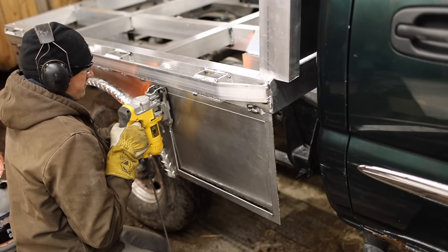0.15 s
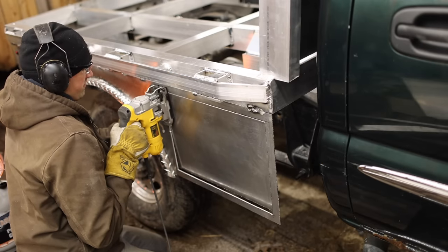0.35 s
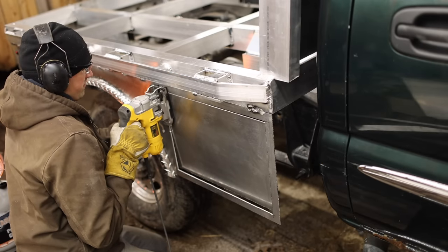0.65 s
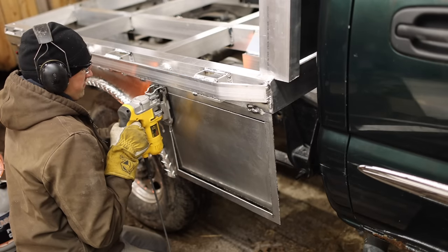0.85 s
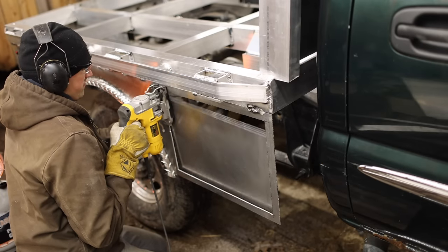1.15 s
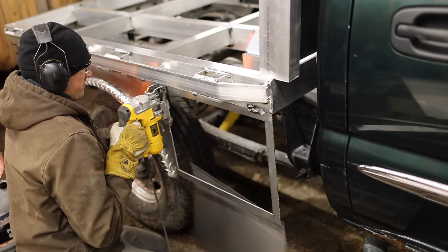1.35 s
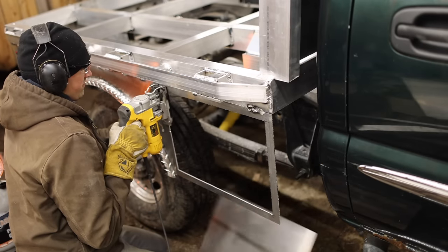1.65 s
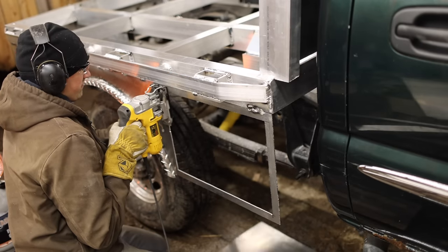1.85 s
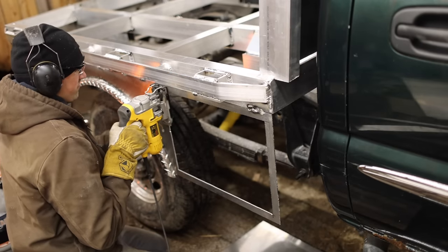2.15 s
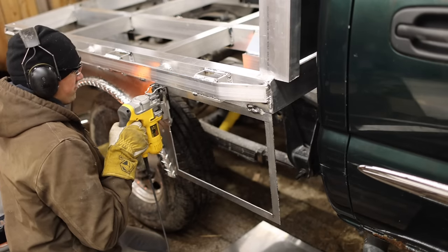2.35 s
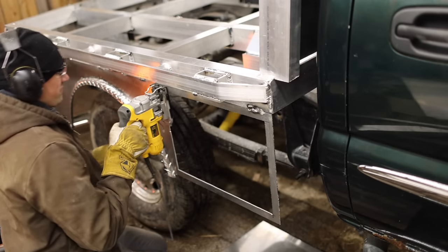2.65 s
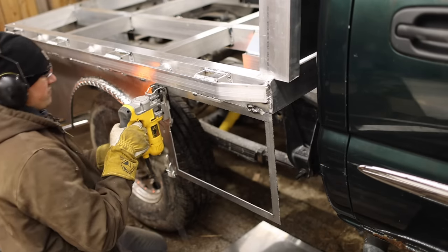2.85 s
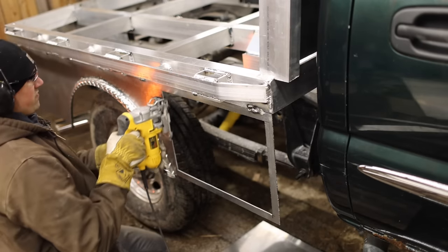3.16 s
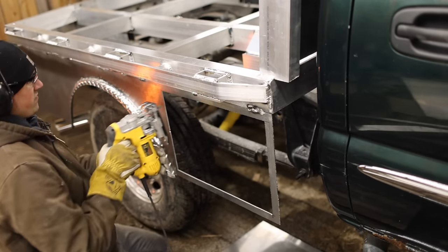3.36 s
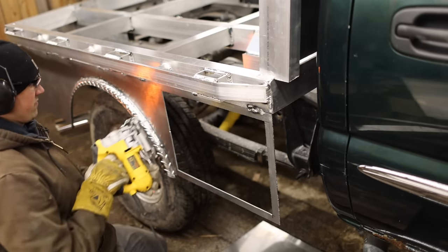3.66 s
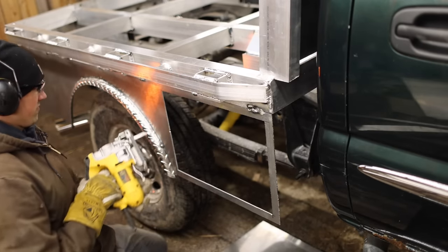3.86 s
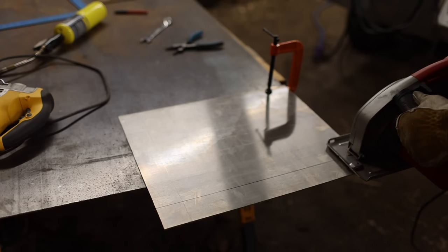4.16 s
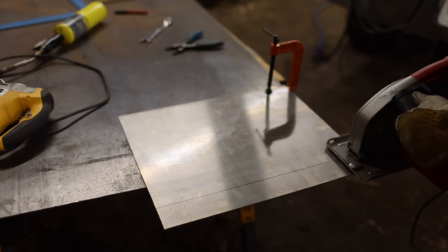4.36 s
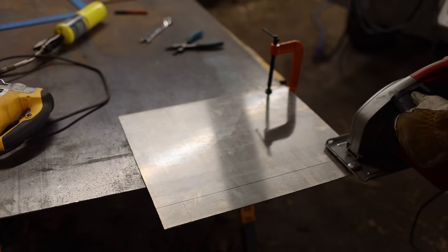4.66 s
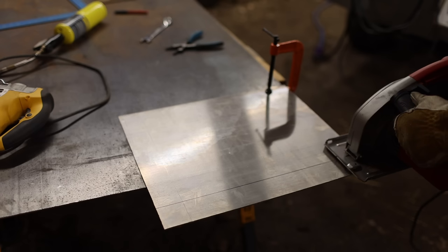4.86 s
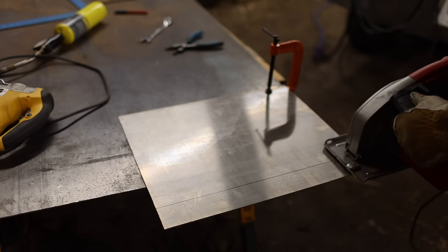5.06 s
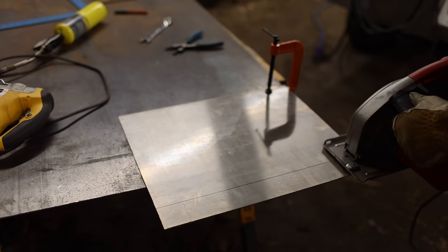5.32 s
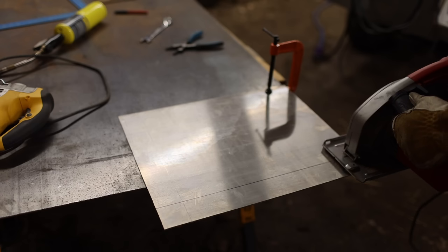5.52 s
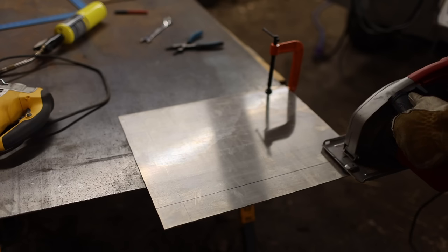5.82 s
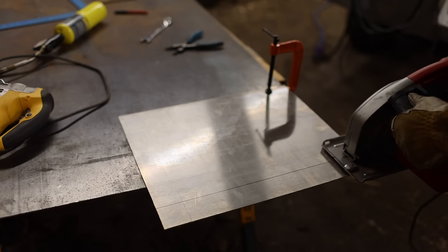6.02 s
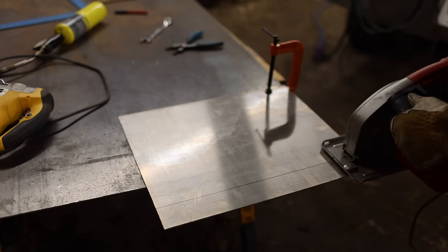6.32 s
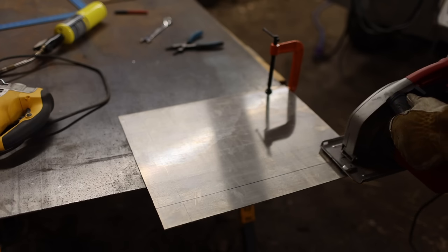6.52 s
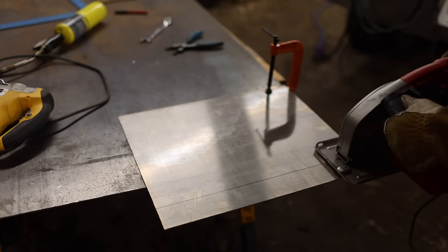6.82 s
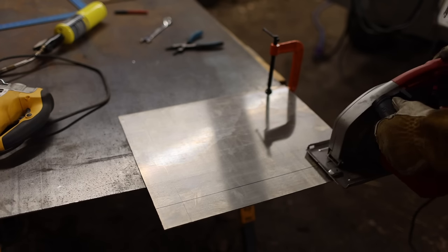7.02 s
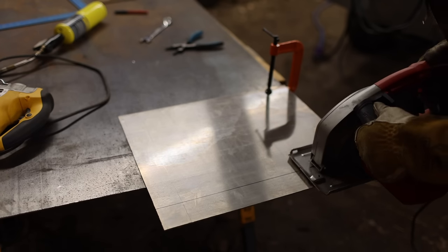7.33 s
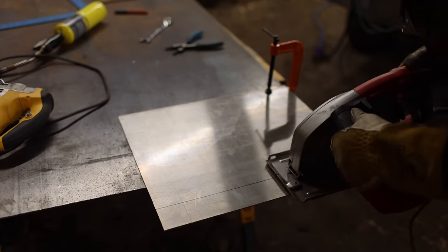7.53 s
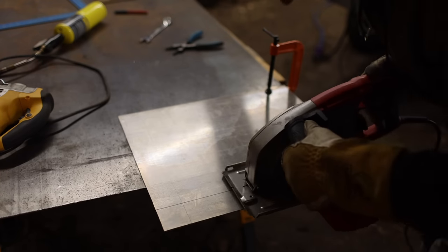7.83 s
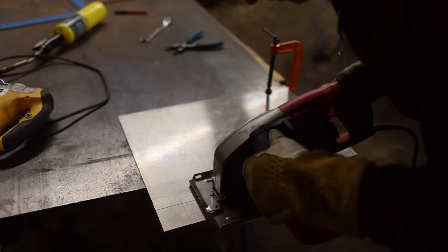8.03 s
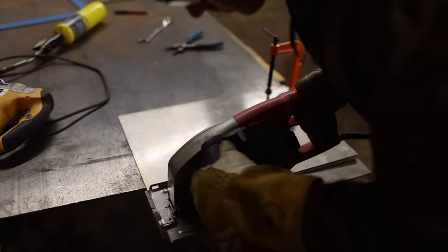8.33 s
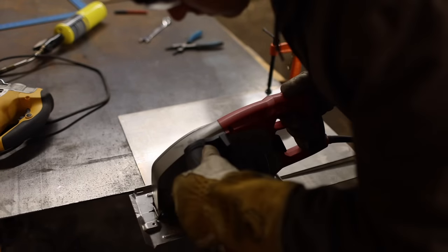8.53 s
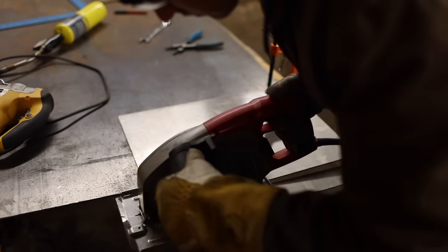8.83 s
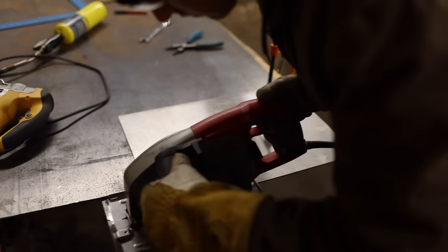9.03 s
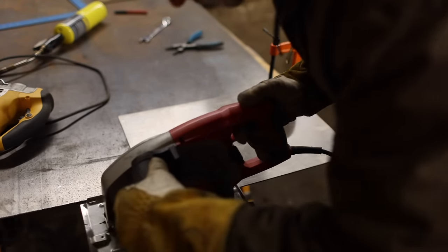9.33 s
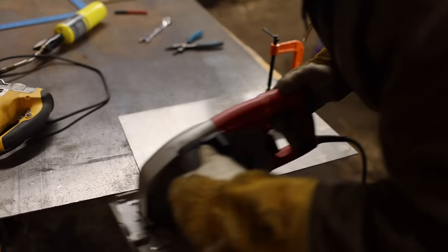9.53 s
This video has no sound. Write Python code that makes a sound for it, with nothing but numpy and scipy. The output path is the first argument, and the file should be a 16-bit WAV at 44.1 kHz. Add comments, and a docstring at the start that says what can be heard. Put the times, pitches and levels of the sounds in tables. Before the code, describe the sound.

Close, dry, centred sound in a garage. From 0 s a jigsaw rasps steadily at about fifty strokes a second, a harsh noisy buzz with shifting metallic drones and a very thin high whine. Near 1.6 s the cut panel comes free and the ringing thins, without a marked crash. At 1.85 s the tool is switched off and coasts: rasp fades, tones and gear whistle slide down, rattling grows, and from 3.4 s separate clacks tick about thirty times a second, slowing until 4 s over faint hum. A tenth of a second of faint hiss follows. At 4.13 s a circular saw buzzes low, then whirs up to a singing whine. From 5.5 s it cuts sheet in uneven, hissing, whistling pushes; from 7.4 s the cut deepens, louder and shriller, its pitch sagging. At 9.1 s cutting stops and the motor whine falls, still running at 9.7 s.

```python
"""A jigsaw in a garage finishes a cut in an aluminium panel, is switched off and coasts down clacking; silence follows.
A circular saw then buzzes, spins up, cuts a clamped sheet in uneven pushes and runs down, all at one microphone.
Each tool is banded noise for its rasp, with sines on multiples of its rotation and noise-driven resonances
for its whines, whistles and ringing parts. Only the faint hiss of the microphone fills the gap."""
import sys
import numpy as np
from scipy import signal
from scipy.fft import rfft, irfft, next_fast_len
from scipy.io import wavfile
from scipy.ndimage import uniform_filter1d, map_coordinates

SR = 44100
rng = np.random.default_rng(int(sys.argv[2]) if len(sys.argv) > 2 else 0)


def waveform_to_disk(signal):
    """Save audio, clipped to [-1, 1], as 16-bit WAV at the path in sys.argv[1]."""
    frames = np.transpose(np.atleast_2d(signal))
    scaled = np.clip(frames, -1, 1) * 32767
    samples = np.round(scaled).astype(np.int16)
    wavfile.write(sys.argv[1], SR, samples)


N = 426885
T = np.arange(N) / SR
JIG_END_S, SAW_START_S = 4.024, 4.128
OFF_S, PANEL_DROPS_S = 1.849, 1.6  # the jigsaw is switched off; the cut panel falls out

# The jigsaw's pace under power. Each row: time in seconds, strokes per second.
JIG_STROKES = [(0.0, 51.7), (0.7, 51.7), (0.9, 51.55), (1.2, 51.8), (1.45, 52.1), (1.64, 53.1), (1.8, 53.0),
               (1.85, 51.9)]
WHINE_PER_STROKE, JIG_WHINE_HZ = 304, 15712  # ratio while coasting; whine under power
COAST_S, COAST_POWER = 5.347, 3.012  # speed falls as (1 - time since switch-off / COAST_S) ** COAST_POWER
CRANK_LEAD = .78  # share of a half stroke past the reversal at switch-off


def jigsaw():
    """One crank drives the rasp, panel tones and clacks; switched off, it slows along a power curve."""
    t = T[T < JIG_END_S]
    on = t < OFF_S
    whine_hz = JIG_WHINE_HZ * (1 - np.clip(t - OFF_S, 0, None) / COAST_S) ** COAST_POWER
    rate = np.where(on, curves(JIG_STROKES, t)[0], whine_hz / WHINE_PER_STROKE)
    phase = turns(rate)
    reversals = (phase - phase[on.sum()]) / np.pi + CRANK_LEAD
    throb = stroke_throb(t, rate, phase, reversals)
    out = jigsaw_rasp(t, rate, throb) + panel_tones(t, rate, phase)
    out = out + jigsaw_whine(t, whine_hz) + gear_whistle(t, rate, throb) + brief(t, JIG_RINGS)
    return out + clacks(t, reversals, rise_s=.003, fall_s=.0045) + garage_hum(t)


THROB_MAX_DB, THROB_FADES_S = 3.2, 3.4  # depth limit before it wanders; the rasp softens near rest


def stroke_throb(t, rate, phase, reversals):
    """The teeth rasp twice a stroke, and slower strokes leave clearer gaps between the two rasps."""
    depth_db = np.minimum(1 + 4 * (1 - rate / rate[0]), THROB_MAX_DB)
    depth_db = depth_db - 2 * np.clip(t - THROB_FADES_S, 0, 1)
    wandering_db = depth_db * (1 + .4 * walk(20, len(t)))
    return wandering_db * np.cos(2 * np.pi * reversals - .4) + .6 * np.cos(4 * phase)


# The jigsaw's noise before a small trim. Each row: time in seconds, middle level in dB,
# then bass, panel boom and hiss in dB over the middle.
JIG_LEVELS = [(0.0, -28, -19, -5, 1.5), (0.32, -29, -19, -4, 2), (0.85, -29, -19.5, -4, 2.5),
              (1.4, -29, -17.5, -5, 2.5), (1.52, -30.5, -18, -5.5, 2.5), (2.0, -31.5, -24.5, -6.5, 2),
              (2.45, -36, -32, -7, 0), (3.0, -41, -35, -5, -1.5), (3.22, -45, -23, -4.5, 0.5),
              (3.45, -52, -17, -4, -0.5), (3.75, -55, -19, -10.5, -1), (4.02, -55.5, -19, -15, -4.5)]
# Those four regions. Each row: lowest and highest frequency in Hz.
JIG_BANDS = [(900, 3500), (40, 220), (280, 750), (4500, 14000)]
# Relative spectrum of the rasp. Each row: frequency in Hz, density in dB per Hz.
JIG_COLOUR = [(15, -62.5), (25, -30.5), (254, -16), (283, -13.5), (512, -8.5), (602, -11), (688, -13),
              (878, -11), (1060, -3.5), (1180, -8.5), (1390, -2.5), (1720, -6.5), (1970, -5), (9930, -6.5),
              (15700, -19.5)]
# Its resonances. Each row: frequency in Hz, width in Hz, boost in dB.
JIG_PEAKS = [(1930, 110, 2.5), (3310, 46, 7), (4240, 83, -0.5), (5430, 45, 5.5), (5750, 65, 6.5),
             (6120, 46, 7.5), (7230, 660, 3), (7660, 45, 4), (9600, 200, 2.5), (10360, 130, 7),
             (11400, 41, 8.5), (12800, 80, 4)]
# Extra colour of the unloaded jigsaw. Each row: frequency in Hz, width in Hz, boost in dB.
COAST_PEAKS = [(2600, 510, 2), (3930, 480, -3), (5040, 250, 2.5), (6600, 310, 4.5), (9000, 610, -1.5),
               (12800, 1500, 0)]
STROKE_REPEAT = 0.29  # share of the rasp that comes again one stroke later, while the panel is being cut


def jigsaw_rasp(t, rate, throb):
    """Teeth tear the metal as noise that throbs with the strokes and partly repeats from stroke to stroke."""
    rasp = undb(-1.0) * roar(t, JIG_COLOUR, JIG_PEAKS, regions(JIG_LEVELS, t), JIG_BANDS, throb,
                             shake_db=0.7, flicker_db=0.82, treble_throb=0.67)
    rasp = tint(rasp, COAST_PEAKS, np.interp(t, [OFF_S, OFF_S + 0.66], [0, 1]))
    return again(rasp, rate, STROKE_REPEAT * window(t, -1, PANEL_DROPS_S))


# How the panel answers the strokes at full speed. Each row: multiple of the stroke rate, level in dB.
PANEL = [(1, -22), (2, -24.5), (3, -17.5), (4, -22.5), (5, -12.5), (6, -14), (7, -9), (8, -9), (9, -8),
         (10, -3), (11, -9), (12, -13), (13, -3), (14, -9.5), (15, -17), (16, -13), (17, -21.5),
         (18, -13.5), (19, -14.5), (20, -8.5), (21, -11), (22, -15.5), (23, -20), (24, -15.5), (25, -10),
         (26, -14), (27, -10), (28, -19), (29, -19.5), (30, -9), (31, -13), (34, -20), (38, -17),
         (39, -12.5), (40, -21), (41, -21), (42, -5.5), (43, -20), (46, -25), (47, -10.5), (48, -25),
         (56, -18.5)]
# Overall level of those tones. Each row: time in seconds, dB over the middle of the noise.
STROKE_TONES = [(0, -8.5), (.3, -10.5), (.5, -8.5), (1.0, -8), (1.45, -10), (1.6, -8.5), (1.9, -11.5),
                (2.4, -12.5), (2.8, -15.5), (3.25, -13), (3.45, -27), (4.03, -40)]
# Multiples that stand out for a while. Each row: start and end in seconds, multiple, extra dB.
SINGING_MULTIPLES = [(0, .25, 9, 10), (0, .25, 13, 4.5), (0, .35, 26, 14), (0, .35, 27, 1), (0, .15, 11, 9),
                     (0.41, 1.35, 10, 6.5), (0.596, .75, 9, 7), (0.616, .88, 14, 8), (.74, .86, 8, 11),
                     (.74, .9, 27, 11.5), (.94, 1.068, 27, 14.5), (.75, .86, 30, 7), (1.15, 1.4, 30, 8),
                     (0, 1.15, 47, 4.5), (.94, 1.06, 39, 8), (0.982, 1.55, 8, 11), (1.0, 1.22, 9, 6.5),
                     (1.03, 1.18, 24, 15.5), (1.22, 1.462, 24, 20), (1.202, 1.47, 20, 10.5),
                     (1.1, 1.47, 25, 7), (1.398, 1.95, 7, 7), (1.6, 1.95, 13, 5.5), (1.92, 2.07, 11, 11.5),
                     (2.1, 2.43, 11, 11), (2.12, 2.36, 13, 10.5), (2.32, 2.43, 12, 14),
                     (1.78, 2.07, 10, 5.5), (2.1, 2.23, 7, 8.5), (2.03, 2.12, 9, 2), (2.33, 2.57, 9, 11),
                     (2.33, 2.47, 14, 7.5), (2.7, 2.8, 14, 13), (2.45, 2.75, 13, 13), (2.5, 3.6, 2, 12),
                     (2.9, 3.0, 16, 10), (3.02, 3.25, 19, 13), (3.27, 3.37, 19, 6)]
FRAME_TOP_HZ, FRAME_DAMP_DB = 650, -6  # with the panel gone, the bare frame rings less above this
FRAME_BOTTOM_HZ, FRAME_THIN_DB = 270, -8  # coasting, the bare frame hardly carries the lowest multiples


def panel_tones(t, rate, phase):
    """Strokes shake the panel on their multiples; coasting, each slides through the same resonances."""
    tones_db = curves(JIG_LEVELS, t)[0] + curves(STROKE_TONES, t)[0]
    multiples, panel_db = np.transpose(PANEL)
    panel_gone = window(t, PANEL_DROPS_S, JIG_END_S)
    coasting = window(t, OFF_S + .2, JIG_END_S)
    out = 0
    for k in range(2, 57):
        hz = k * rate
        db = np.interp(hz / rate[0], multiples, panel_db) + tones_db + 1.4 * walk(7, len(t))
        db = db + FRAME_DAMP_DB * panel_gone * np.clip(hz / FRAME_TOP_HZ * 10 - 9, 0, 1)
        db = db + FRAME_THIN_DB * coasting * np.clip(10 - hz / FRAME_BOTTOM_HZ * 10, 0, 1)
        for a, b, multiple, extra_db in SINGING_MULTIPLES:
            if k == multiple:
                db = db + extra_db * window(t, a, b)
        out = out + tone(k * phase, db)
    return out


# The jigsaw's commutator whine. Each row: time in seconds, level in dB before it wanders.
JIG_WHINE = [(0, -47), (1.1, -44), (1.25, -65.5), (1.8, -66), (1.87, -48), (2.5, -46), (3.0, -58),
             (3.2, -60), (3.3, -87)]


def jigsaw_whine(t, whine_hz):
    """The commutator whine holds its pitch under power and falls with the strokes while coasting, unsteadily."""
    return tone(turns(whine_hz) + 0.7 * walk(100, len(t)), curves(JIG_WHINE, t)[0] + 3 * walk(25, len(t)))


GEAR_TEETH = 92
# Gears whistling while the tool coasts. Each row: time in seconds, level in dB before the throb.
GEAR_WHISTLE = [(2.15, -70), (2.26, -42), (2.38, -43), (2.43, -47), (2.5, -43), (2.6, -46), (2.68, -50),
                (2.8, -47), (2.92, -56), (3.1, -80)]


def gear_whistle(t, rate, throb):
    """Meshing gears whistle as a narrow band on the tooth rate, throbbing with the strokes."""
    return ring(t, GEAR_TEETH * rate, 55, curves(GEAR_WHISTLE, t)[0] + 1.3 * throb)


# Brief rings of the jigsaw, played by brief().
# Each row: start and end in seconds, frequency in Hz, width in Hz, level in dB.
JIG_RINGS = [(2.42, 2.5, 4900, 50, -50), (2.64, 2.92, 5100, 45, -52), (2.8, 3.0, 5400, 50, -56),
             (3.13, 3.27, 5120, 160, -49), (3.13, 3.27, 5450, 200, -55), (3.13, 3.27, 5780, 160, -53),
             (3.3, 3.6, 4950, 80, -63), (3.04, 3.14, 450, 25, -50), (3.24, 3.3, 370, 25, -52),
             (3.36, 3.43, 570, 25, -55)]

# Modes of the rattling housing. Each row: frequency in Hz, width in Hz, relative level in dB.
HOUSING = [(1346, 350, -4), (1987, 380, -0.5), (2420, 360, -4.5)]
# Loose rattle between the clacks. Each row: time in seconds, drive of the housing in dB.
RATTLE = [(2.6, -59), (3.2, -51.5), (3.6, -54), (4.03, -59)]
# The last, separate clacks. Each row: time in seconds, strength in dB before the housing modes.
LAST_CLACKS = [(3.4314, -37), (3.462, -39), (3.4894, -40), (3.5199, -38), (3.55, -43), (3.5803, -39),
               (3.6112, -41), (3.6421, -41), (3.6735, -43), (3.7085, -35), (3.7474, -36), (3.7798, -33),
               (3.8222, -40), (3.8566, -32), (3.902, -35), (3.9474, -40), (3.9884, -48)]
CLACKS_FROM_S, CLACKS_FULL_S = 1.8, 2.6  # they fade in as the speed drops
CLACK_DB, CLACK_SCATTER_DB = -45, 2.2  # mean drive of the housing and its spread
CRACK_HZ, CRACK_WIDTH_HZ, CRACK_DB = 2150, 700, 0  # the broad crack at the start of a separate clack


def clacks(t, reversals, rise_s, fall_s):
    """Each reversal of the slowing crank shakes the housing; the last knocks ring it cleanly."""
    def knock(late):
        return np.exp(-late / fall_s) * (1 - np.exp(-late / rise_s))

    count = np.floor(reversals).astype(int)
    since_reversal = t - t[np.searchsorted(count, count)]
    peak_db = CLACK_DB + CLACK_SCATTER_DB * rng.standard_normal(200)[np.clip(count, 0, 199)]
    share = np.interp(t, [CLACKS_FROM_S, CLACKS_FULL_S], [0, 1]) * (t < LAST_CLACKS[0][0])
    force = undb(curves(RATTLE, t)[0]) + share * undb(peak_db) * knock(since_reversal)
    out = force * sum(ring(t, hz, width_hz, db) for hz, width_hz, db in HOUSING)
    hz, width_hz, db = np.transpose(HOUSING)[:, :, None]
    for s, strength_db in LAST_CLACKS:
        near = (t > s) & (t < s + 10 * fall_s)
        late = t[near] - s
        # every knock excites the modes a little differently in level and pitch
        level_chance, pitch_chance = rng.standard_normal((2, len(HOUSING), 1))
        mode_hz = hz + width_hz / 3 * pitch_chance
        modes = undb(db + CLACK_SCATTER_DB * level_chance) * np.sin(2 * np.pi * mode_hz * late)
        crack = np.exp(-late / fall_s) * ring(late, CRACK_HZ, CRACK_WIDTH_HZ, CRACK_DB)
        out[near] += undb(strength_db) * knock(late) * (modes.sum(axis=0) + crack)
    return out


# Steady hum of the garage under the jigsaw. Each row: frequency in Hz, level in dB.
HUM = [(172.3, -80), (258.4, -67.5), (366.1, -77), (463, -79.5), (689.1, -81)]


def garage_hum(t):
    """Low sines that keep their pitch and level whatever the tool does."""
    return sum(tone(2 * np.pi * hz * t, db) for hz, db in HUM)


# The saw spinning up free. Each row: time in seconds, commutator whine in Hz, whine level in dB before it wanders.
SPIN_UP = [(4.13, 3000, -80), (4.33, 7800, -70), (4.4, 8950, -64), (4.46, 9800, -68), (4.55, 10800, -59),
           (4.66, 11700, -63), (4.78, 12470, -65), (4.99, 13400, -65), (5.399, 14230, -63),
           (5.5, 14360, -64)]
# The saw running down. Each row: time in seconds, commutator whine in Hz, whine level in dB before it wanders.
RUN_DOWN = [(9.12, 13880, -57), (9.23, 14490, -54), (9.43, 13840, -56), (9.56, 13280, -56),
            (9.68, 12620, -58)]
# The load drags the blade down. Each row: time in seconds, tooth rate in Hz.
TEETH = [(5.52, 3477), (5.65, 3490), (6.31, 3537), (6.93, 3517), (7.15, 3495), (7.33, 3510), (7.38, 3517),
         (7.4, 3455), (7.485, 3445), (7.505, 3392), (7.6, 3365), (7.64, 3333), (7.79, 3330), (7.82, 3275),
         (7.86, 3300), (7.93, 3310), (7.96, 3265), (8.09, 3230), (8.12, 3270), (8.26, 3290), (8.62, 3330),
         (8.68, 3335), (8.93, 3285), (9.09, 3380)]
# The blade in the sheet. Each row: time in seconds, push on the scale of the cutting hiss in dB,
# shudder of the sheet in the low range in dB.
PUSH = [(5.52, -39, -41), (5.54, -34, -38), (5.57, -34.5, -40.5), (5.66, -41, -46), (5.86, -43.5, -46),
        (5.89, -37, -46), (5.91, -45, -50), (5.94, -43, -43), (6.02, -40.5, -44), (6.14, -34, -38.5),
        (6.22, -30, -32.5), (6.3, -33.5, -37), (6.33, -30, -33.5), (6.4, -35, -39.5), (6.55, -30.5, -33.5),
        (6.57, -40, -43), (6.66, -34, -39.5), (6.75, -42, -50), (6.79, -39.5, -46), (6.9, -37, -43),
        (7.08, -39, -41.5), (7.12, -35, -45), (7.18, -41, -40), (7.21, -33, -40.5), (7.31, -38, -43.5),
        (7.43, -35, -39), (7.56, -38, -40), (7.6, -32.5, -36.5), (7.63, -31, -34.5), (7.65, -31, -36.5),
        (7.7, -31, -35), (7.75, -31.5, -38), (7.79, -33, -37), (7.81, -26.5, -31), (7.85, -31, -31.5),
        (7.89, -28, -32), (7.92, -33, -34.5), (7.99, -31, -35.5), (8.035, -27.5, -31), (8.09, -28, -30.5),
        (8.14, -31.5, -36.5), (8.2, -28, -31), (8.26, -31.5, -34), (8.28, -30.5, -36), (8.36, -29, -34.5),
        (8.43, -30, -33), (8.5, -29.5, -32.5), (8.57, -29.5, -32), (8.64, -30, -34.5), (8.73, -30.5, -35),
        (8.8, -31, -36.5), (8.91, -29, -34), (8.93, -28, -33.5), (8.96, -36, -40.5), (9.03, -28, -30),
        (9.08, -32, -40), (9.12, -34, -37)]
BARS, TEETH_PER_TURN, GEAR = 37, 9, .15  # per armature turn: commutator bars, teeth passing, blade turns
FIRM_PUSH_DB, FIRM_SHUDDER_DB = -32, -35
STEADY_PER_DB = .06  # a firmer push steadies the blade


def circular_saw():
    """One armature speed drives hum, whine and tooth rate; the wobbling blade bites harder once a turn."""
    t = T[T >= SAW_START_S]
    free = np.array(SPIN_UP + RUN_DOWN)
    free_speed = [(s, hz / BARS) for s, hz, _ in free]
    cut_speed = [(s, hz / TEETH_PER_TURN) for s, hz in TEETH]
    speed = curves(sorted(free_speed + cut_speed), t)[0]
    phase = turns(speed)
    cut_from_s, cut_to_s = TEETH[0][0], TEETH[-1][0]
    biting = np.interp(t, [cut_from_s - .005, cut_from_s, cut_to_s, cut_to_s + 0.025], [0, 1, 1, 0])
    push_db, shudder_db = curves(PUSH, t)
    firmness_db = push_db - FIRM_PUSH_DB
    wobble = np.cos(GEAR * phase) * (1 + .5 * walk(4.65, len(t)))
    wobble = wobble * np.clip(.5 - STEADY_PER_DB * firmness_db, .25, 1)
    cut_db = cutting_levels(t, firmness_db, shudder_db)
    out = saw_rasp(t, biting, cut_db, wobble)
    out = out + biting * (tooth_whistles(t, phase, push_db, wobble) + blade_modes(t, cut_db[-1] + 9.2 * wobble))
    out = out + biting * blade_thump(t, speed, firmness_db) + guard_song(t) + brief(t, SAW_RINGS)
    out = out + motor(t, phase, curves(free, t)[1], biting) + stall_buzz(t)
    return comb(t, out) * np.clip((t - SAW_START_S) / 0.019, 0, 1)


# Cutting noise in middle, rumble, boom, guard, rasp and hiss. Each row: level in dB at a firm cut,
# dB gained per dB of shudder for the first three, of push for the rest.
CUT = [(-38, 0.98), (-47, 1.3), (-41.5, 1.37), (-43, 1.8), (-41, 1.1), (-34, 1.1)]
CHATTER_DB, CHATTER_PER_S = 2.2, 150  # the sheet chatters against the blade in quick jolts


def cutting_levels(t, firmness_db, shudder_db):
    """The shuddering, chattering sheet sets the low regions, the push of the blade the high ones."""
    chatter_db = CHATTER_DB * np.tanh(walk(CHATTER_PER_S, len(t)))
    low = shudder_db - FIRM_SHUDDER_DB + chatter_db
    drives = 3 * [low] + 3 * [firmness_db]
    return np.array([db + slope * drive for (db, slope), drive in zip(CUT, drives)])


# Noise of the free-running saw before a small trim. Each row: time in seconds, middle level in dB,
# then rumble, sheet boom, guard, rasp and hiss in dB over the middle.
FREE_LEVELS = [(4.13, -41.5, -23, -6.5, -10, -17, -23), (4.25, -39, -30, -8, -6, -12, -11),
               (4.36, -46.5, -20, -1, -4, -10, -14), (4.52, -44, -26, -6, -1.5, -9, -10),
               (4.9, -39.5, -29, -7.5, -3.5, -8.5, -8.5), (5.5, -40, -28, -8, -1, -3, -6.5),
               (9.0, -41.5, -28, -2.5, 4.5, 1.5, 1), (9.2, -38.5, -26, -8.5, 2.5, 0.5, 2.5),
               (9.33, -41, -24, -4, 3.5, -1, 2), (9.47, -39.5, -30, -7.5, 3, -4, 0),
               (9.68, -42, -22, -5, -2.5, -5, -1.5)]
# Those six regions. Each row: lowest and highest frequency in Hz.
SAW_BANDS = [(750, 2700), (60, 220), (260, 620), (2900, 4100), (4400, 6200), (7600, 16000)]
# Relative spectrum of the saw. Each row: frequency in Hz, density in dB per Hz.
SAW_COLOUR = [(15, -63), (25, -26), (140, -14), (380, -9.5), (831, -2.5), (1180, -0.5), (2020, -4.5),
              (2510, -8), (3030, -10), (3470, -8.5), (5060, -11), (6810, -9.5), (9410, -12.5), (10800, -14),
              (15700, -22)]
# Resonances of the blade guard. Each row: frequency in Hz, width in Hz, boost in dB.
SAW_PEAKS = [(1110, 160, 4), (2500, 280, 4), (3450, 400, 4), (4650, 200, 2), (6050, 140, 2), (6700, 200, 3),
             (11000, 420, 3)]
# Extra colour of the guard while the blade spins free. Each row: frequency in Hz, width in Hz, boost in dB.
FREE_PEAKS = [(3960, 170, 4), (9400, 600, -1)]


def saw_rasp(t, biting, cut_db, wobble):
    """Running and cutting noise add in power, coloured by the guard; the cut throbs once a blade turn."""
    power = undb(regions(FREE_LEVELS, t)) ** 2 + (biting * undb(cut_db)) ** 2
    rasp = undb(-0.9) * roar(t, SAW_COLOUR, SAW_PEAKS, 10 * np.log10(power), SAW_BANDS, 0.49 * biting * wobble,
                             shake_db=0.85, flicker_db=0.85, treble_throb=1)
    return tint(rasp, FREE_PEAKS, 1 - biting)


# The sheet whistles on the tooth rate. Each row: start and end in seconds, multiple of the tooth rate,
# level in dB before wobble and wander.
WHISTLES = [(5.55, 7.15, 1, -52), (7.19, 7.45, 1, -41), (7.6, 7.7, 1, -41), (7.81, 7.913, 1, -37),
            (7.962, 8.1, 1, -36), (8.129, 8.326, 1, -31), (8.353, 8.62, 1, -33), (8.736, 8.919, 1, -38),
            (8.99, 9.069, 1, -40), (5.54, 5.852, 2, -39.5), (5.865, 7.101, 2, -34), (7.185, 7.46, 2, -39),
            (7.49, 7.65, 2, -34.5), (7.9, 7.951, 2, -38), (8.03, 8.262, 2, -41.5), (8.682, 8.956, 2, -42),
            (5.54, 5.68, 3, -42), (5.685, 5.9, 3, -54), (8.28, 8.82, 3, -48), (5.54, 6.2, 4, -64),
            (6.25, 7.15, 4, -58), (7.18, 7.454, 4, -46), (7.47, 8.25, 4, -38), (8.62, 8.82, 4, -46)]
WHISTLE_UNDER_PUSH_DB = -18.5  # between whistles every multiple stays faintly there


def tooth_whistles(t, phase, push_db, wobble):
    """Teeth strike the sheet one after another, so it whistles on multiples and halves of their changing rate."""
    faint = undb(push_db + WHISTLE_UNDER_PUSH_DB)
    levels_db, out = [], 0
    for k in range(1, 5):
        size = faint + sum(undb(db) * window(t, a, b) for a, b, multiple, db in WHISTLES if multiple == k)
        levels_db.append(20 * np.log10(size) + 1.35 * walk(12, len(t)))
    # uneven teeth smear the phase of each whistle
    for k, db in enumerate(levels_db):
        smear = (.15 + .25 * k) * walk(200, len(t)) + (.2 + .1 * k) * walk(40, len(t))
        out = out + tone((k + 1) * TEETH_PER_TURN * phase + smear, db + 3.9 * wobble + 1.9 * walk(60, len(t)))
    # teeth set left and right in turn add lines halfway between
    for odd, db in ((3, levels_db[0] - 16), (5, levels_db[1] - 17), (7, levels_db[2] - 9)):
        halfway = odd / 2 * TEETH_PER_TURN * phase + 0.64 * walk(150, len(t))
        out = out + tone(halfway, db + 3 * walk(7.4, len(t)))
    return out


# Blade modes rung while the cut passes the places that drive them. Each row: start and end in seconds,
# frequency in Hz, width in Hz, level in dB relative to the cutting hiss.
BLADE_MODES = [(5.5, 6.75, 8680, 140, -10), (5.6, 7.15, 7350, 160, -8), (5.5, 7.3, 10450, 70, -16),
               (6.05, 6.72, 13130, 60, -14), (5.9, 6.75, 12700, 110, -13), (6.05, 6.6, 11900, 60, -17),
               (7.2, 7.3, 8900, 250, -10), (7.7, 8.12, 6150, 200, -10), (7.75, 8.1, 6500, 150, -10),
               (7.8, 7.95, 9000, 200, -12), (7.95, 8.9, 11450, 70, -13), (8.9, 9.08, 11560, 70, -8),
               (8.28, 9.07, 13130, 35, -11), (8.27, 9.06, 9890, 60, -11), (8.27, 9.05, 14880, 45, -18),
               (8.2, 9.0, 9350, 250, -12), (8.2, 9.0, 8620, 120, -14), (8.2, 9.05, 12650, 200, -14)]


def blade_modes(t, hiss_db):
    """The teeth ring the blade's modes, each swelling on its own."""
    out = np.zeros(len(t))
    for a, b, hz, width_hz, db in BLADE_MODES:
        near = (t > a - .05) & (t < b + .05)
        swell_db = hiss_db[near] + db + 3.0 * walk(10.9, near.sum())
        out[near] += window(t[near], a, b) * ring(t[near], hz, width_hz, swell_db)
    return out


BLADE_THUMP_DB = -59.5  # at a firm push


def blade_thump(t, speed, firmness_db):
    """The wobbling blade thumps the sheet: a low narrow band on the blade's turning rate."""
    return ring(t, GEAR * speed, 17, BLADE_THUMP_DB + 0.51 * firmness_db)


# Air singing in the guard. Each row: time in seconds, centre in Hz, level in dB before the parts' own.
GUARD_SONG = [(4.5, 3300, -64), (4.6, 3360, -45.5), (4.85, 3390, -42), (5.1, 3445, -40.5),
              (5.5, 3480, -42.5), (5.85, 3473, -42), (5.89, 3473, -52), (5.95, 3473, -41),
              (6.1, 3500, -43.5), (7.1, 3497, -43.5), (7.8, 3500, -43), (9.0, 3484, -42.5),
              (9.12, 3474, -54), (9.3, 3520, -47), (9.45, 3466, -53), (9.68, 3430, -50)]
# Parts of the song. Each row: offset from its centre in Hz, width in Hz, relative level in dB.
GUARD_PARTS = [(0, 60, -5), (30, 180, -3), (-215, 100, -4)]


def guard_song(t):
    """Air in the guard sings in three neighbouring bands that move together as the blade spins."""
    song_hz, song_db = curves(GUARD_SONG, t)
    return sum(ring(t, song_hz + hz, width_hz, song_db + db) for hz, width_hz, db in GUARD_PARTS)


# Passing resonances of the saw, played by brief().
# Each row: start and end in seconds, frequency in Hz, width in Hz, level in dB.
SAW_RINGS = [(4.3, 4.6, 590, 30, -52), (4.4, 4.55, 1120, 40, -54), (9.42, 9.7, 2560, 45, -44),
             (6.07, 6.5, 13500, 35, -49), (8.2, 9.08, 5850, 50, -46), (8.2, 9.0, 4900, 35, -49),
             (9.17, 9.22, 5580, 50, -44), (9.18, 9.23, 1140, 70, -41)]

# Armature hum. Each row: multiple of the armature rate, level in dB before the swell.
ARMATURE = [(1, -56), (2, -51.5), (3, -56)]
# Swell of that hum. Each row: time in seconds, gain in dB.
HUM_SWELL = [(4.3, -30), (4.45, -4.5), (5.3, -1.5), (5.6, 3), (5.95, 4), (6.05, 2), (6.6, -2), (6.7, 1),
             (6.95, 0), (7.3, -2), (7.8, -2), (9.03, -3), (9.1, 5), (9.24, 2), (9.3, 2.5), (9.68, -3)]
# Cooling fan whine. Each row: start and end in seconds, multiple of the armature rate, level in dB before it wanders.
FAN = [(4.75, 5.5, 16, -57), (4.9, 5.2, 32, -64), (9.3, 9.7, 32, -56)]


def motor(t, phase, whine_db, biting):
    """Commutator bars, fan and armature each sound on multiples of the motor's turning rate."""
    whine_phase = BARS * phase + 0.8 * walk(120, len(t))
    out = (1 - .5 * biting) * tone(whine_phase, whine_db + 2.8 * walk(23.0, len(t)))
    for a, b, k, db in FAN:
        out = out + window(t, a, b) * tone(k * phase, db + 3 * walk(20, len(t)))
    swell_db = curves(HUM_SWELL, t)[0]
    for k, db in ARMATURE:
        out = out + tone(k * phase + 0.38 * walk(30, len(t)), db + swell_db + 3.1 * walk(18, len(t)))
    return out


MAINS_BUZZ_HZ, BUZZ_END_S = 120.2, 4.32  # twice the mains rate
# The stalled motor's buzz. Each row: multiple of MAINS_BUZZ_HZ, level in dB before it wanders.
BUZZ = [(1, -62), (2, -49), (3, -54), (4, -55), (5, -41.5), (8, -53), (9.25, -52), (10, -55), (11, -57),
        (12, -54), (15, -58), (17, -60), (19, -57)]


def stall_buzz(t):
    """The stalled motor buzzes on twice the mains rate."""
    times_s = [SAW_START_S, SAW_START_S + 0.083, BUZZ_END_S - .03, BUZZ_END_S + 0.0078]
    stall = np.interp(t, times_s, [0, 1, 1, 0])
    return stall * sum(tone(2 * np.pi * k * MAINS_BUZZ_HZ * t, db + 2.0 * walk(26, len(t))) for k, db in BUZZ)


# Twice, briefly, a slightly delayed copy joins in and hollows the sound. Each row: centre in seconds,
# reach in seconds (silent past 0.9 of it), lag in seconds, share of the undelayed sound.
COMB = [(9.267, 0.047, 0.000345, 0.69), (9.34, 0.032, 0.000286, 0.61)]


def comb(t, x):
    """Adds a delayed copy that notches every odd multiple of half the inverse lag."""
    out = x
    for s, reach_s, lag_s, share in COMB:
        copy_gain = share * np.clip(1.5 - 1.66 * np.abs(t - s) / reach_s, 0, 1)
        out = (out + copy_gain * np.interp(t - lag_s, t, x)) / np.sqrt(1 + copy_gain ** 2)
    return out


def microphone_hiss():
    """Faint steady white noise of the microphone."""
    return undb(-90.5) * rng.standard_normal(N)


def undb(db):
    """Gain of a level in dB."""
    return 10 ** (np.asarray(db) / 20)


def curves(table, t):
    """Columns of a table at times t."""
    s, *columns = np.transpose(table)
    return [np.interp(t, s, column) for column in columns]


def regions(table, t):
    """Level of every region in dB from a table given over the middle."""
    middle, *rest = curves(table, t)
    return np.array([middle] + [middle + r for r in rest])


def window(t, a, b):
    """One between a and b, with short ramps."""
    return np.interp(t, [a - .02, a, b, b + 0.019], [0, 1, 1, 0])


def walk(rate, n):
    """Random levels held 1 / rate s and slewed twice; spread near 1."""
    k = int(SR / rate)
    steps = np.repeat(rng.standard_normal(n // k + 1), k)
    return 1.26 * uniform_filter1d(uniform_filter1d(steps, k), k)[:n]


def turns(hz):
    """Running phase of a rotation, in radians."""
    return 2 * np.pi * np.cumsum(hz) / SR


def tone(phase, db):
    """Sine of rms level db."""
    return np.sqrt(2) * undb(db) * np.sin(phase + 2 * np.pi * rng.random())


def ring(t, hz, width_hz, db):
    """A resonance kept alive by noise: a tone whose two quadrature parts wander."""
    phase = turns(hz + 0 * t)
    in_phase = walk(2 * width_hz, len(t)) * np.cos(phase)
    quadrature = walk(2 * width_hz, len(t)) * np.sin(phase)
    return undb(db) * (in_phase + quadrature)


def brief(t, table):
    """Resonances that sound for a moment."""
    out = np.zeros(len(t))
    for a, b, hz, width_hz, db in table:
        near = (t > a - .05) & (t < b + .05)
        out[near] += window(t[near], a, b) * ring(t[near], hz, width_hz, db)
    return out


def resonances(hz, peaks):
    """Boost in dB of a set of bell-shaped resonances."""
    return sum(g / (1 + (2 * (hz - f) / w) ** 2) for f, w, g in peaks)


def roar(t, colour, peaks, levels_db, bands, throb, shake_db, flicker_db, treble_throb):
    """Noise with resonances; each region follows its level, all shake together, each half octave flickers."""
    n = next_fast_len(len(t))
    hz = np.fft.rfftfreq(n, 1 / SR)[1:]
    colour_hz, colour_db = np.transpose(colour)
    db = np.interp(np.log(hz), np.log(colour_hz), colour_db) + resonances(hz, peaks)
    spectrum = rfft(rng.standard_normal(n)) * np.r_[0, undb(db)]
    # the level each region has by itself, to be replaced by the wanted one
    own_db = [10 * np.log10(2 * np.sum(undb(db[(hz > a) & (hz < b)]) ** 2) / n) for a, b in bands]
    gains_db = levels_db - np.array(own_db)[:, None]
    edges = np.log2(sorted(bands)).ravel()
    order = np.repeat(np.argsort([a for a, _ in bands]), 2)
    octave = np.log2(np.r_[1, hz])
    shake = shake_db * walk(30.03, len(t))
    out = 0
    for centre in np.arange(4.5, 14.1, .5):
        band = irfft(spectrum * np.clip(1 - 2 * np.abs(octave - centre), 0, 1), n)[:len(t)]
        shares = [np.interp(centre, edges, 1. * (order == k)) for k in range(len(bands))]
        # the throb of the tool is clearest in the upper middle
        depth = np.interp(centre, [8, 11, 12, 13], [0, 1, 1, treble_throb])
        flicker = flicker_db * walk(14, len(t))
        out = out + band * undb(shares @ gains_db + shake + flicker + depth * throb)
    return out


def again(x, rate, share):
    """The same teeth meet the same edge: part of the noise repeats once and twice a cycle later."""
    once, twice = [map_coordinates(x, [np.arange(len(x)) - k * SR / rate], mode="mirror") for k in (1, 2)]
    return (x + share * once + share ** 2 * twice) / np.sqrt(1 + share ** 2 + share ** 4)


def tint(x, peaks, share):
    """Blends in the same sound with extra resonances and hollows."""
    n = next_fast_len(len(x))
    boost_db = resonances(np.fft.rfftfreq(n, 1 / SR), peaks)
    tinted = irfft(rfft(x, n) * undb(boost_db), n)[:len(x)]
    return x + share * (tinted - x)


def scene():
    """The two tools in turn over the faint hiss of the microphone, alike in both channels."""
    first, second = jigsaw(), circular_saw()
    silence = np.zeros(N - len(first) - len(second))
    mono = np.r_[first, silence, second] + microphone_hiss()
    return np.array([mono, mono])


TOP_HZ = 15770


def record(dry):
    """The recorder cuts the top steeply."""
    return signal.sosfilt(signal.ellip(14, .5, 80, TOP_HZ, fs=SR, output="sos"), dry)


dry = scene()
out = record(dry)
waveform_to_disk(out)
```